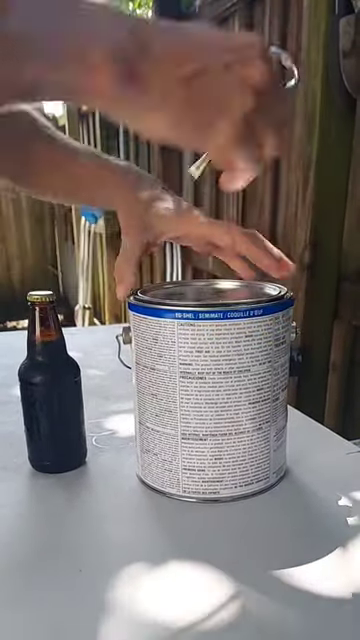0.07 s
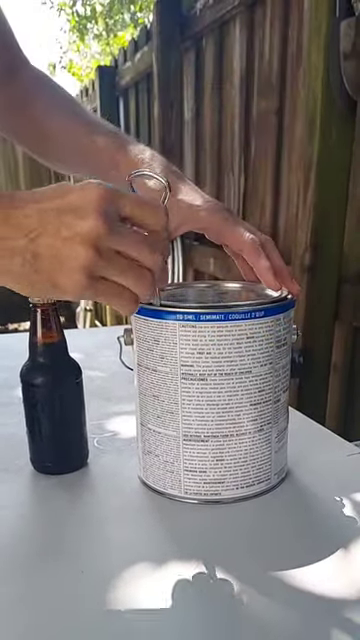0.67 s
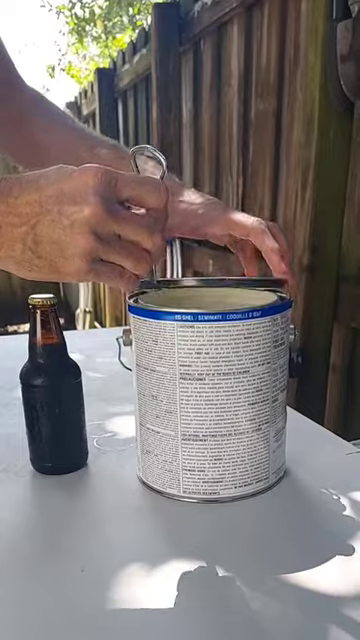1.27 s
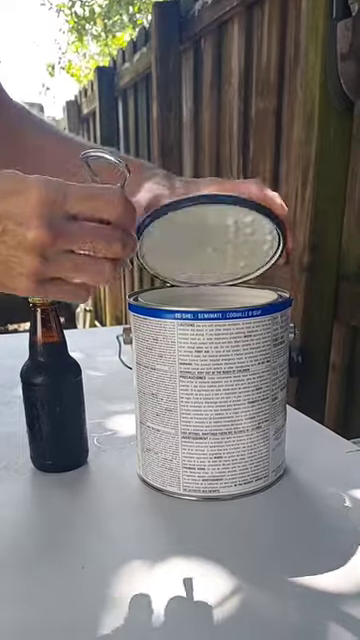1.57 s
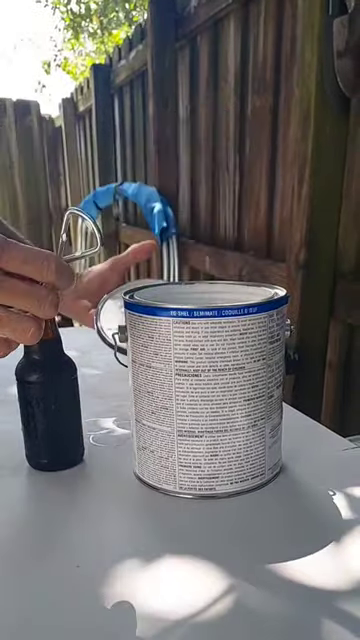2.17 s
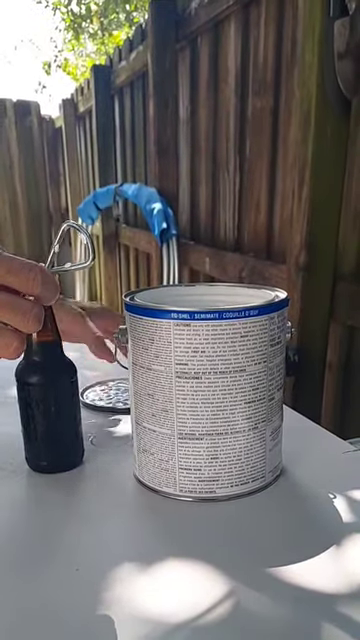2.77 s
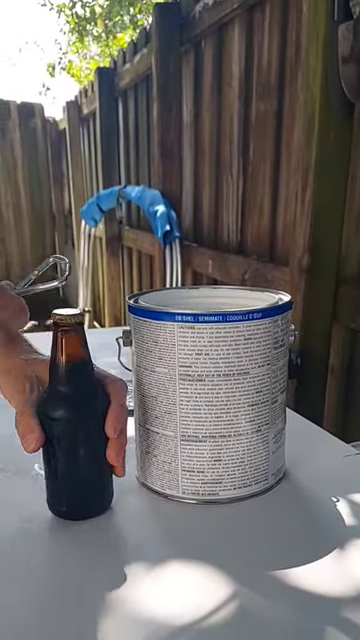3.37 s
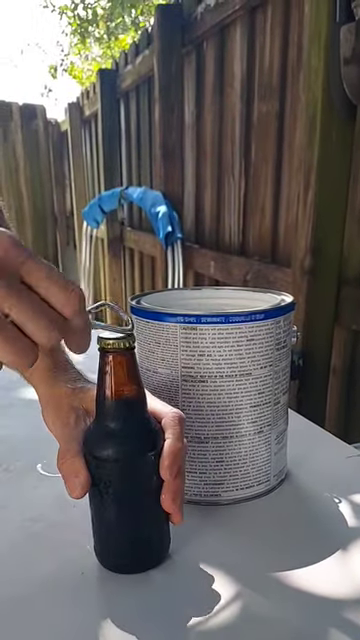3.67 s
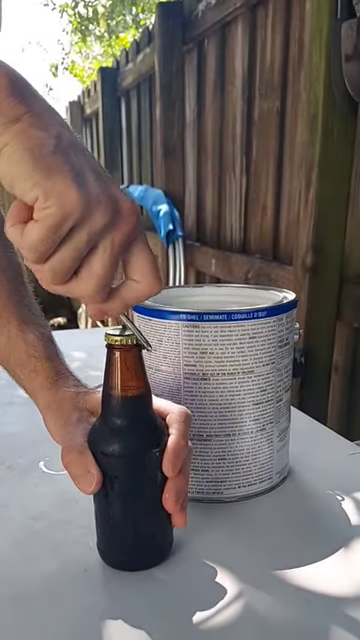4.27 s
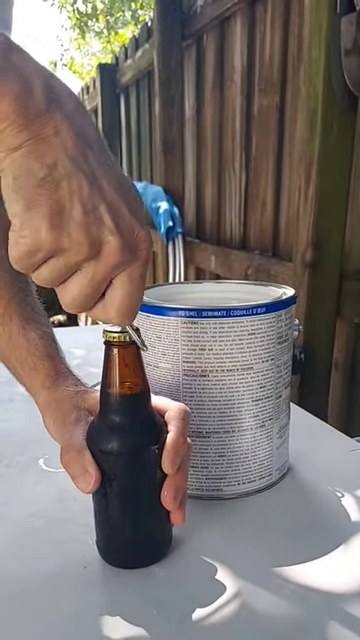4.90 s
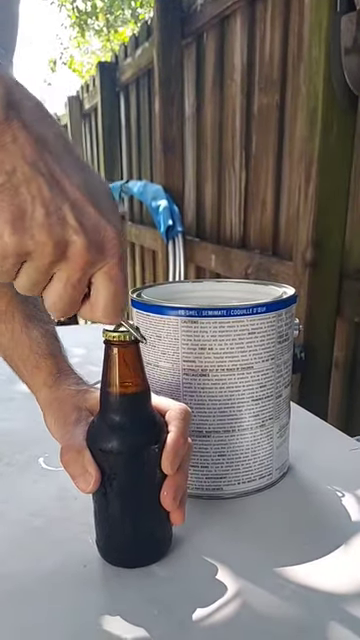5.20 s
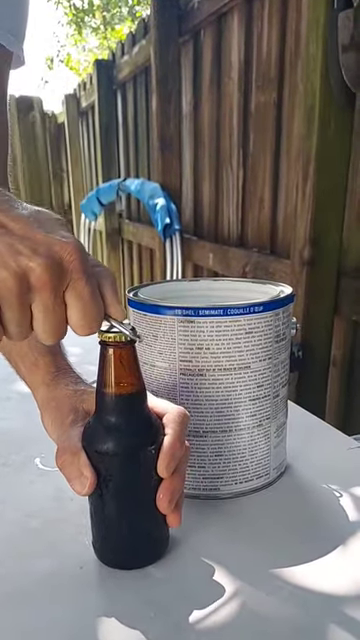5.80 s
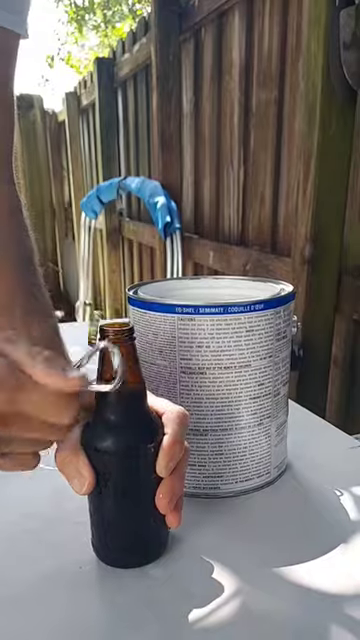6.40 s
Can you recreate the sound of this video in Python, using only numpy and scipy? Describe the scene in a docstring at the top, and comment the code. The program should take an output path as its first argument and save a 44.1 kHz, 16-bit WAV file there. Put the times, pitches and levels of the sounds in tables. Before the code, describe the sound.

A low outdoor rumble and a faint machine hum run throughout, and the nearby sounds carry a slight echo. From about 0.7 to 1 second, a steel opener pries at a paint can's lid in a quick run of sharp clicks, with one more near 1.5 seconds. Around 1.7 seconds the sticky lid comes free with a faint rasp and a tiny squeak. It lands on a hollow plastic table at 2.6 seconds and clatters loudly until about 2.9. At 3.7 seconds a glass bottle is dragged with a short, low judder. The opener then clinks and scrapes on the bottle's cap from 3.8 to 5.5 seconds, most strongly around 4.8. Gas escapes in a brief hiss at 6 seconds. The cap pops off with a loud, sharp snap near 6.35 seconds, rattles, and strikes the opener with a bright chink around 6.6.

```python
"""A low outdoor rumble and hum, then sharp clicks: a steel opener pries at a paint can's lid.
The sticky lid rasps free and clatters onto a hollow plastic table. A glass bottle is dragged closer;
the opener clinks and bites on its crown cap, gas hisses out and the cap pops off. Each impact excites
damped modes, each rub is stick-slip friction, and the yard's fence answers with a faint echo."""
import sys
import numpy as np
from scipy import signal
from scipy.fft import rfft, irfft, next_fast_len
from scipy.io import wavfile
from scipy.ndimage import uniform_filter1d, map_coordinates

SR = 44100
rng = np.random.default_rng(int(sys.argv[2]) if len(sys.argv) > 2 else 0)


def int16_out(signal):
    """Quantize to a 16-bit WAV file."""
    q = np.round(np.clip(np.atleast_2d(signal).T, -1, 1) * 32767)
    wavfile.write(sys.argv[1], SR, q.astype(np.int16))


N = 293265
T = np.arange(N) / SR
AGE = T[:SR // 2]  # time since a blow [s]

# Levels in the tables are relative; each source adds its own gain.
RUMBLE_LEVELS = [(0, -52.5), (3.3, -54), (3.9, -51.5), (4.6, -53.5), (5.2, -54), (6.65, -53.5)]  # slow course of the rumble: (time [s], level [dB])
HUM_PARTIALS = [(59, -63.5), (120, -58), (297, -66.5)]  # a distant machine: (frequency [Hz], level [dB])
ECHO_DECAY = [(150, 0.6), (1000, 0.36), (5000, 0.26), (15000, 0.21)]  # reverberation of the yard: (frequency [Hz], t60 [s])

# Continuous spectra: (frequency [Hz], spectral level [dB])
RUMBLE_SPECTRUM = [(20, -45), (48, -4), (120, -3.5), (300, -13.5), (400, -20), (600, -26.5), (900, -27.5),
                   (1300, -34.5), (2000, -50), (6200, -57), (8000, -52.5), (10000, -58), (16000, -64)]  # outdoor air
JET_SPECTRUM = [(900, -39), (4080, -18), (6230, -10), (7330, -8), (8260, -0.5), (9610, -7.5), (11700, 0),
                (16000, -1)]  # escaping gas
RASP_SPECTRUM = [(700, -10), (2000, -1), (3600, -6.5), (5400, -6.5), (9500, -12), (13000, -6), (16000, -15)]  # sticky rim
SQUEAK_SPECTRUM = [(1000, -10), (2000, -5), (3500, -17), (5500, 1.5), (9000, -18), (11200, -8)]  # envelope of the squeak's harmonics
TICK_SPECTRUM = [(2000, -28), (6000, -3), (9500, -8.5), (11500, 0.5), (13500, -6), (16000, -10.5)]  # instant of contact
TIN_SPECTRUM = [(500, -22), (1200, 3.5), (1700, 1), (2900, 2.5), (3800, -6), (6000, -14), (9000, -32),
                (16000, -35)]  # dense modes of can and lid
STEEL_SPECTRUM = [(600, -18), (1500, 6.5), (2400, 2.5), (3100, -4), (4400, 0.5), (5800, -9.5), (7500, -5),
                  (9500, -23.5), (16000, -31.5)]  # dense modes of the opener
CRIMP_SPECTRUM = [(600, -28), (1400, -0.5), (2600, -3.5), (3600, -3), (5700, 4.5), (7500, -2), (10000, -1),
                  (16000, -9)]  # dense modes of the cap
THUD_SPECTRUM = [(60, -16), (150, -6), (350, 1), (700, -2.5), (1200, -7.5), (2200, -30.5), (5000, -49.5)]  # dense modes of a knocked body

# Distinct modes of each object: (frequency [Hz], level [dB], t60 before contact damping [s])
TABLE_MODES = [(133, -2, .14), (176, -7, .12), (220, -1, .09), (462, 0, .1), (620, -2, .11)]
CAN_MODES = [(1270, -4, 0.06), (2344, 3, 0.045), (2720, -2, 0.06), (3950, -7, .04)]
CAN_AIR_MODES = [(443, 6.5, 0.052), (698, 0.5, 0.096), (940, -8, 0.05)]
LID_MODES = [(1290, -3, .14), (1400, 1, .14), (1502, -1, .6), (1922, 0, .35), (1974, -1, .35),
             (2035, -3, .4), (2360, 1, .3), (2476, 0, .28), (2745, 0, .32), (2930, 2, .28), (3311, -1, .34),
             (4920, -12, .3)]
LID_SHEET_MODES = [(308, -1, .2), (420, -5, .3), (500, -1, .12), (617, -3, .22), (1011, -1, .28),
                   (1062, -2, .2), (1177, -4, .38)]
BOTTLE_MODES = [(459, -3, .06), (615, 2, .07), (700, 0, .05), (1250, -5, .03)]
OPENER_MODES = [(1588, -2, .25), (1954, -6, .5), (2573, -9, .16), (3860, 4, .2), (4334, -2, .16),
                (4510, 6, .075), (4969, 3, .1), (5163, 2, .09), (7000, -6, .1), (7380, -7, .11),
                (8600, -8, .09), (11160, -6, .1)]
OPENER_LOOP_MODES = [(4603, 6, .1), (4915, -4, .09), (5582, -9, .1), (5927, -17, .3), (11160, 0, .13),
                     (12410, -9, .09)]
CAP_MODES = [(1590, 4, .05), (2460, 1, 0.1), (5070, 0, .04), (5880, 17, 0.01), (7420, 14, 0.02)]
# Resonances of the rubbed lid: (frequency [Hz], bandwidth [Hz], level [dB])
RIM_RESONANCES = [(2050, 350, -2), (5000, 700, 1), (6100, 500, -6)]

# Rubs on tacky paint: (start [s], duration [s], level [dB])
FINGER_RUBS = [(.93, 0.28, -79.5), (2.19, .16, -77.5), (2.44, 0.44, -69.5)]
RIM_RUBS = [(1.635, 0.085, -62.5), (1.757, 0.094, -59)]
# Sliding steel and glass: (start [s], end [s], level [dB], tilt [dB/octave], favoured frequency [Hz])
SLIDES = [(3.677, 3.793, -61.5, -1.5, 2970), (4.014, 4.032, -53, 0, 4330), (4.556, 4.66, -60, -6.5, 4400),
          (4.718, 4.82, -49.5, -4, 1380), (5.021, 5.098, -57, -6.5, 4600),
          (5.309, 5.369, -49.5, -7.5, 2960), (6.439, 6.513, -48, -1.5, 5100),
          (6.554, 6.575, -34.5, 10, 9700)]
# The opener levers the can's rim: (time [s], ring [dB], knock [dB], tick [dB], ring frequency [Hz])
LID_PRIES = [(0.6977, -36.5, -47.5, -52, 4060), (0.8346, -34.5, -44.5, -52, 2440),
             (0.8691, -26.5, -38, -52, 2540), (0.9138, -38, -48, -54, 5200),
             (0.9194, -33.5, -34, -58, 7400), (0.9564, -45.5, -47.5, -45, 8020),
             (1.4516, -42, -56, -55, 4200)]
# The lid lands edge first, then flat: (time [s], ring [dB], knock [dB], ring frequency [Hz])
LID_LANDINGS = [(2.577, -24, -22.5, 2750), (2.5828, -24.5, -24, 1400), (2.6183, -25.5, -26.5, 2400),
                (2.7779, -24, -30, 2150), (2.7939, -14, -25, 2950), (2.812, -29, -31.5, 1940),
                (2.8264, -26, -32, 2300), (2.8376, -21.5, -26, 2400), (2.8699, -24.5, -28, 1920),
                (2.8855, -33.5, -30, 2880)]
# The opener meets the capped bottle:
# (time [s], ring [dB], tick relative to ring [dB], ring frequency [Hz], slack [0-1])
OPENER_CLINKS = [(3.839, -46.5, -13, 6900, 0.9), (3.847, -45, -9, 5100, 1), (3.9014, -40, -29, 4000, 0.63),
                 (3.9164, -40.5, -23, 4380, 0.7), (3.9874, -46.5, -26, 4260, .4),
                 (4.0317, -29, -14, 4970, .9), (4.0766, -39.5, -21, 3940, 1), (4.1758, -41, -10, 4550, 0.7),
                 (4.2238, -46, -1.5, 8100, 0.45), (4.3051, -44, -22, 4000, 0.26),
                 (4.356, -35, -29, 4630, 0.19), (4.5437, -48, -33, 1980, 0.15),
                 (4.7092, -31.5, -6, 7140, 0.87), (4.728, -30.5, -30, 4140, 0.2),
                 (4.7413, -27.5, -30, 3870, .15), (4.7678, -29.5, -25.5, 4450, 0.28),
                 (4.7863, -29, -17, 4500, 0.44), (4.8344, -25.5, -26, 4360, 0.1),
                 (4.887, -44.5, -16, 3760, 0.15), (5.094, -49, -40, 1510, 0.05),
                 (5.3531, -38, -31, 2040, 0.05), (5.506, -53.5, -41, 2790, 0.14)]
# Cap impacts: (time [s], ring [dB], knock [dB], tick [dB], ring frequency [Hz], knock frequency [Hz])
CAP_SNAPS = [(6.2769, -32.5, -33.5, -48, 1250, 610), (6.324, -25, -28.5, -35, 3350, 450),
             (6.3456, -7, -37, -28, 7250, 660), (6.359, -14.5, -48, -29, 5880, 220),
             (6.4055, -23.5, -62, -40, 5780, 450), (6.425, -30, -66, -48, 5540, 450),
             (6.466, -27, -46, -53, 5300, 680), (6.492, -30.5, -51, -57, 5200, 450),
             (6.523, -23, -38, -32, 5630, 220), (6.530, -26, -38.5, -35, 4730, 500)]  # it bends, snaps free and rattles in the loop
CAP_CHINKS = [(6.5764, -13, -39.5, -16, 4760, 1390), (6.5863, -32, -47, -56, 4600, 440)]  # once loose, it strikes the opener


def amp(db):
    """Decibels to amplitude ratio."""
    return 10 ** (np.asarray(db) / 20)


def unit(x):
    """Scale to rms 1."""
    return x / np.sqrt(np.mean(x ** 2) + 1e-20)


def crest(x, size=220):
    """Scale so that the loudest run of size samples has rms 1."""
    return x / np.sqrt(uniform_filter1d(x ** 2, size).max() + 1e-20)


def along(points, hz):
    """Interpolate (frequency [Hz], value) points on a logarithmic frequency axis."""
    knots, values = np.transpose(points)
    return np.interp(np.log(hz + 1), np.log(knots + 1), values)


def noise(spectrum, count, tilt_db=0, ripple_db=0):
    """Spectrally shaped noise of rms 1, tilted per octave; ripple forms chance resonances."""
    hz = np.fft.rfftfreq(count, 1 / SR)
    ripple = map_coordinates(rng.standard_normal(128), [hz / 220], order=3, mode="wrap")
    db = along(spectrum, hz) + tilt_db * np.log2(hz + 1) + ripple_db * ripple
    return unit(irfft(rfft(rng.standard_normal(count)) * amp(db), count))


def wobble(rate, count=N):
    """Smooth random modulation with rate knots a second."""
    return map_coordinates(rng.standard_normal(4096), [np.arange(count) * rate / SR], order=3, mode="wrap")


def swell(start, length, power):
    """A half-sine envelope, narrowed by a higher power."""
    return np.abs(np.sin(np.pi * np.clip((T - start) / length, 0, 1))) ** power


def fade(t60):
    """Exponential free decay, 60 dB in t60 seconds."""
    return np.exp(-np.log(1000) * AGE / t60)


def add(track, time, sound):
    """Superpose a sound on the track at a time in seconds."""
    part = track[round(time * SR):][:len(sound)]
    part += sound[:len(part)]


def favour(x, hz, lift_db, q):
    """The point of excitation decides which band of modes responds most."""
    b, a = signal.iirpeak(hz, q, SR)
    return crest(x + amp(lift_db) * signal.lfilter(b, a, x))


def burst(spectrum, t60):
    """Modal overlap: many short-lived modes merge into decaying noise."""
    return crest(noise(spectrum, len(AGE), ripple_db=3.5) * fade(t60))


def ring(modes, spectrum, dense_db, dense_t60, free=1):
    """Impulse response: damped sinusoids, their t60 scaled by free, over a burst of dense modes."""
    hz, db, t60 = np.transpose(modes)[:, :, None]
    hz = hz * (1 + 0.0033 * rng.standard_normal(hz.shape))  # each contact detunes the modes a little
    strength = amp(db + 2 * rng.standard_normal(hz.shape))
    phase = 2 * np.pi * rng.random(hz.shape)
    distinct = np.sum(strength * fade(t60 * free) * np.sin(2 * np.pi * hz * AGE + phase), axis=0)
    return crest(crest(distinct) + amp(dense_db) * burst(spectrum, dense_t60))


def impacts(rows, metal, body, spectrum, *, free, ring_db, ring_lift_db, dense_db, dense_t60,
            knock_db, knock_lift_db, thud_db, thud_t60, tick_db, tick_t60):
    """Each impact ticks, rings the metal and knocks the body behind it; less slack means more damping."""
    track = np.zeros(N)
    for time, ring_level, knock_level, tick_level, ring_hz, knock_hz, slack in rows:
        clang = ring(metal, spectrum, dense_db, dense_t60 * slack ** 0.23, free * slack)
        clang = amp(ring_level + ring_db) * favour(clang, ring_hz, ring_lift_db, q=9.3)
        thud = ring(body, THUD_SPECTRUM, thud_db, thud_t60 * slack ** 0.2, np.sqrt(slack))
        thud *= 1 - fade(0.0043)
        knock = amp(knock_level + knock_db) * favour(thud, knock_hz, knock_lift_db, q=6.9)
        tick = amp(tick_level + tick_db) * burst(TICK_SPECTRUM, tick_t60)
        add(track, time, (clang + tick) * (1 - fade(0.0045)) + knock)
    return track


def outdoors():
    """Low-frequency noise drifts in level; a distant machine's hum wavers in amplitude and phase."""
    rumble_db = np.interp(T, *np.transpose(RUMBLE_LEVELS)) + 1.5 + 1.1 * wobble(4.99)
    rumble = amp(rumble_db) * noise(RUMBLE_SPECTRUM, N)
    hum = sum(amp(db + 3 * wobble(3.123)) * unit(np.sin(2 * np.pi * hz * T + 0.6 * wobble(5.7)))
              for hz, db in HUM_PARTIALS)
    return rumble + hum


def fence_echo(x):
    """Diffuse reflection from the boards: a reverberant tail whose high frequencies decay first."""
    hz, time, bands = signal.stft(rng.standard_normal(SR // 2), SR, nperseg=256)
    decay = amp(-60 * time / along(ECHO_DECAY, hz)[:, None])
    tail = signal.istft(bands * decay, SR, nperseg=256)[1][:len(AGE)] * (1 - fade(0.041))
    return signal.fftconvolve(x, tail / np.linalg.norm(tail))[:N]


def paint_crackle(rubs, spectrum):
    """Adhesion: tacky paint lets go in fine grains under each rub."""
    pressure = sum(amp(db) * swell(start, length, power=1.1) for start, length, db in rubs)
    grains = unit(amp(2.5 * wobble(400) + 1.5 * wobble(30)))
    return pressure * grains * noise(spectrum, N)


def scrapes():
    """Sliding friction: tiny slips drive the held steel's modes, harder as the pressure grows."""
    track = np.zeros(N)
    highpass = signal.butter(2, 900, "high", fs=SR, output="sos")
    for start, end, db, tilt_db, hz in SLIDES:
        count = round((end - start) * SR)
        pressure = np.sin(np.pi * np.linspace(0, 1, count) ** 1.12).clip(0)
        slips = pressure * amp(4.4 * wobble(900, count)) * noise([(1, 0)], count, tilt_db)
        steel = ring(OPENER_MODES, STEEL_SPECTRUM, dense_db=3.5, dense_t60=0.026, free=0.15)
        scrape = signal.sosfilt(highpass, signal.fftconvolve(slips, steel))
        add(track, start, amp(db + 3.5) * favour(scrape, hz, lift_db=4.5, q=7.4))
    return track


def lid_rasp():
    """Forced vibration: the sticky rim rubs past the opener and drives the lid's resonances."""
    rasp = paint_crackle(RIM_RUBS, RASP_SPECTRUM)
    resonance = sum(amp(db) * signal.lfilter(*signal.iirpeak(hz, hz / width, SR), rasp)
                    for hz, width, db in RIM_RESONANCES)
    return amp(-2.5) * rasp + amp(2) * resonance


def lid_squeak():
    """Periodic stick-slip: the rim's slips briefly turn regular and give a rising harmonic tone."""
    start, length = 1.785, 0.047  # [s]
    slip_hz, rise_hz_per_s, jitter = 1002, 870, 0.0117
    rate = (slip_hz + rise_hz_per_s * np.clip(T - start, 0, length)) * (1 + jitter * wobble(350))
    phase = 2 * np.pi * np.cumsum(rate) / SR
    tone = unit(sum(amp(along(SQUEAK_SPECTRUM, k * slip_hz)) * np.sin(k * phase) for k in range(1, 13)))
    return amp(-57 + 3.1 * wobble(340)) * swell(start, length, power=0.8) * tone


def bottle_drag():
    """Slow stick-slip: the glass drums the hollow table ever more weakly, favouring a rising band."""
    start, period = 3.683, 0.0205  # [s]
    track = np.zeros(N)
    for slip in range(5):
        drum = ring(TABLE_MODES, THUD_SPECTRUM, dense_db=-8.5, dense_t60=0.093) * (1 - fade(0.0055))
        drum = favour(drum, hz=135 + 6 * slip, lift_db=11.5 - 3.8 * slip, q=2.2)
        add(track, start + slip * period, amp(-32 - slip ** 2) * drum)
    return track


def lid_pry():
    """Impulsive release: the lid yields in jerks, exciting the hand-damped can and the air inside."""
    knock_hz, slack = 450, 1
    rows = [(*row, knock_hz, slack) for row in LID_PRIES]
    return impacts(rows, CAN_MODES, CAN_AIR_MODES, TIN_SPECTRUM, free=0.67,
                   ring_db=-12, ring_lift_db=9, dense_db=5, dense_t60=0.07,
                   knock_db=0.5, knock_lift_db=-16, thud_db=-5, thud_t60=0.085, tick_db=3, tick_t60=0.023)


def lid_chatter():
    """A Poisson train of impacts: the wobbling rim taps the table between landings."""
    taps_per_s = 230
    hits = rng.random(N) < taps_per_s / SR
    taps = hits * np.sqrt(rng.exponential(size=N)) * swell(start=2.775, length=0.14, power=0.82)
    lid = ring(LID_MODES, TIN_SPECTRUM, dense_db=13, dense_t60=0.046, free=0.54)
    return amp(-40) * crest(signal.fftconvolve(taps, lid)[:N], size=2000)


def lid_drop():
    """Plate vibration under contact damping: the lid's landings grow duller and shorter as it settles."""
    first_s, settle_s = LID_LANDINGS[0][0], 2.63
    settle_per_s, tick_loss_db_per_s, knock_hz = 7, 73.5, 380
    rows = []
    for time, db, knock_level, hz in LID_LANDINGS:
        tick_level = db - 17.5 - tick_loss_db_per_s * (time - first_s)
        slack = np.exp(-settle_per_s * max(time - settle_s, 0))
        rows.append((time, db, knock_level, tick_level, hz, knock_hz, slack))
    return impacts(rows, LID_MODES, LID_SHEET_MODES, TIN_SPECTRUM, free=1,
                   ring_db=-8.5, ring_lift_db=2, dense_db=12.5, dense_t60=0.11,
                   knock_db=-3.5, knock_lift_db=-9, thud_db=1, thud_t60=0.15, tick_db=-4.5, tick_t60=0.073)


def opener_clinks():
    """Contact damping: light taps let the steel ring; tight bites crunch and push the bottle more."""
    rows = []
    for time, db, relative_tick_db, hz, slack in OPENER_CLINKS:
        knock_hz = 660 * 2 ** (0.3 * rng.standard_normal())  # shifts with the grip
        knock_level = db - 7 - 4.5 * slack
        rows.append((time, db, knock_level, db + relative_tick_db, hz, knock_hz, slack))
    return impacts(rows, OPENER_MODES, BOTTLE_MODES, STEEL_SPECTRUM, free=0.87,
                   ring_db=-5, ring_lift_db=7, dense_db=-1.5, dense_t60=0.094,
                   knock_db=-2, knock_lift_db=-2.5, thud_db=-2.5, thud_t60=0.11, tick_db=2, tick_t60=0.042)


def gas_hiss():
    """Jet noise: its amplitude follows the fourth power of the gap as the seal lifts and closes."""
    return amp(-26) * swell(start=5.937, length=0.13, power=4) * noise(JET_SPECTRUM, N)


def cap_pop():
    """Sudden release: the crimp snaps, thumping the bottle on the table; the cap then rings the opener."""
    slack = 1
    snap = impacts([(*row, slack) for row in CAP_SNAPS], CAP_MODES, TABLE_MODES, CRIMP_SPECTRUM,
                   free=0.62, ring_db=-9, ring_lift_db=11, dense_db=4, dense_t60=0.024,
                   knock_db=0, knock_lift_db=-5, thud_db=-6, thud_t60=0.084, tick_db=-5, tick_t60=0.042)
    chink = impacts([(*row, slack) for row in CAP_CHINKS], OPENER_LOOP_MODES, BOTTLE_MODES, CRIMP_SPECTRUM,
                    free=0.69, ring_db=-7.5, ring_lift_db=2, dense_db=5, dense_t60=0.042,
                    knock_db=0, knock_lift_db=7, thud_db=4, thud_t60=0.052, tick_db=-7, tick_t60=0.023)
    return snap + chink


def scene():
    """Superposition of the direct sound, its echo and the outdoor background, in mono."""
    strikes = lid_pry() + lid_drop() + lid_chatter() + opener_clinks() + cap_pop()
    friction = scrapes() + paint_crackle(FINGER_RUBS, TICK_SPECTRUM) + lid_rasp() + lid_squeak()
    direct = strikes + friction + bottle_drag() + gas_hiss()
    return (direct + amp(-12.5) * fence_echo(direct) + outdoors())[None]


def record(dry):
    """Band limiting: a steep low-pass removes the highest treble."""
    cutoff_hz = 16000
    size = next_fast_len(N + SR // 2)
    hz = np.fft.rfftfreq(size, 1 / SR)
    return irfft(rfft(dry, size) / (1 + (hz / cutoff_hz) ** 150), size)[..., :N]


dry = scene()
out = record(dry)
int16_out(out)
```